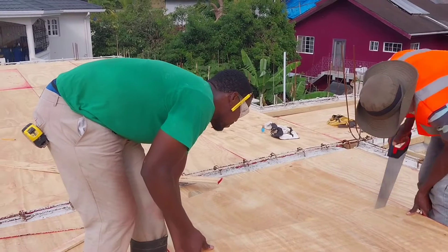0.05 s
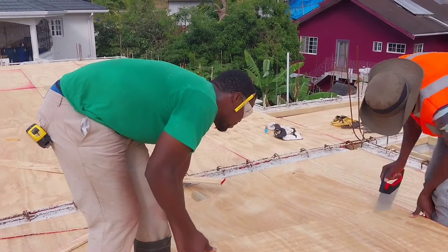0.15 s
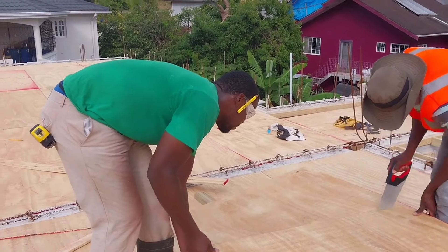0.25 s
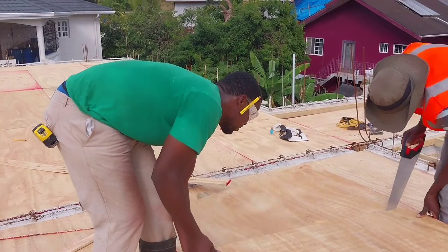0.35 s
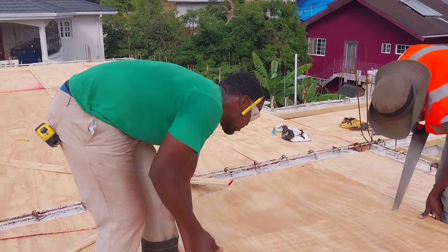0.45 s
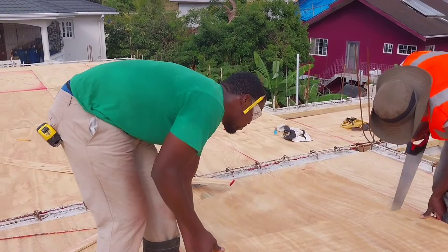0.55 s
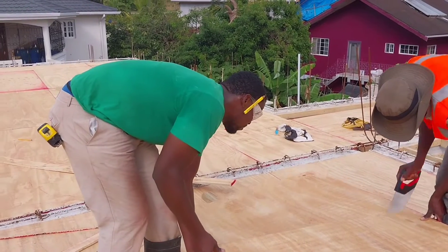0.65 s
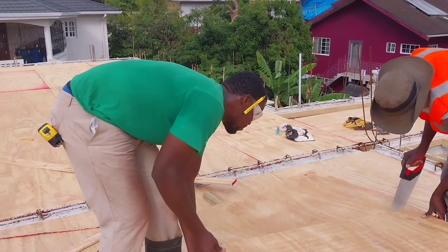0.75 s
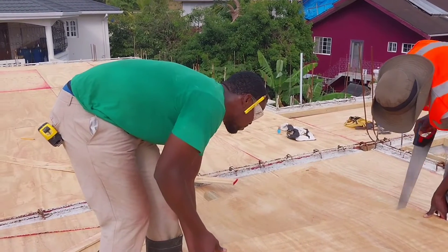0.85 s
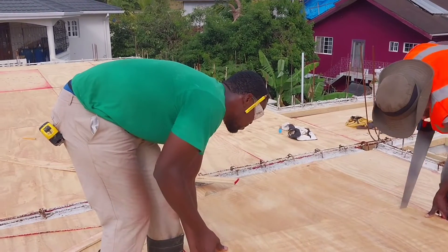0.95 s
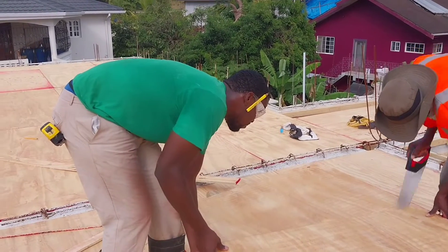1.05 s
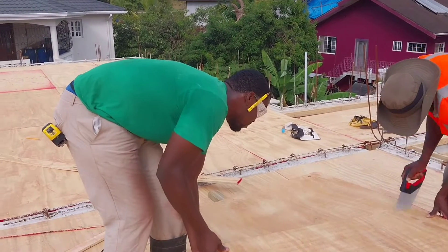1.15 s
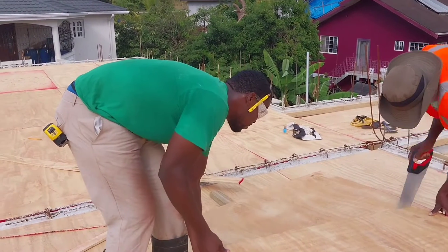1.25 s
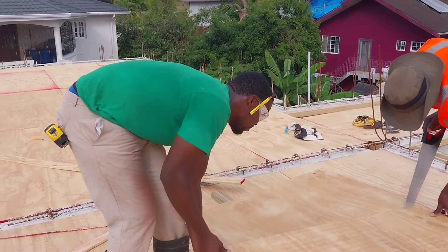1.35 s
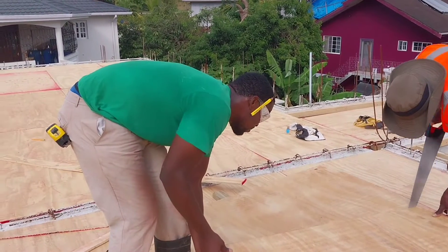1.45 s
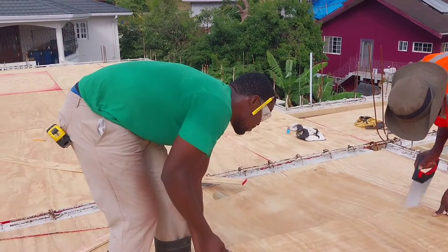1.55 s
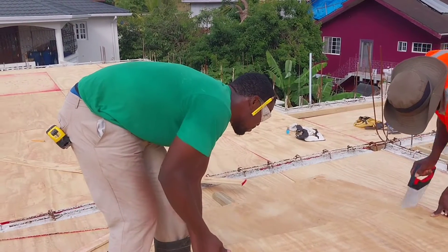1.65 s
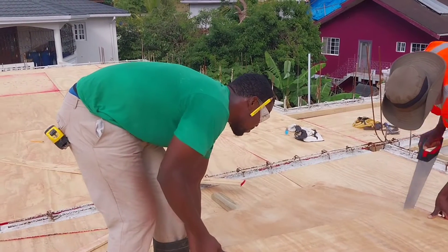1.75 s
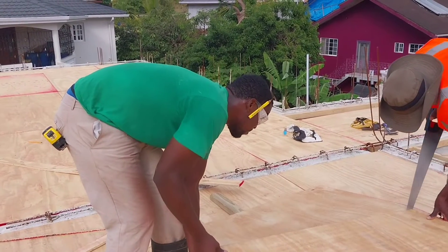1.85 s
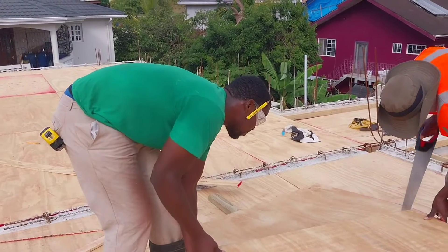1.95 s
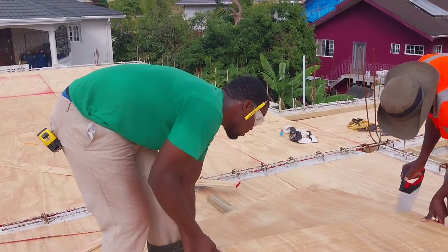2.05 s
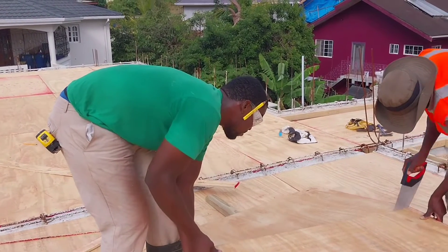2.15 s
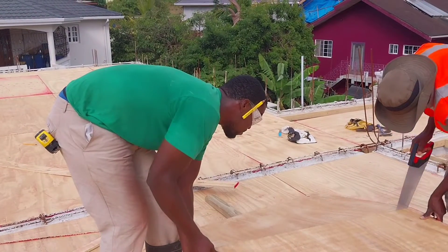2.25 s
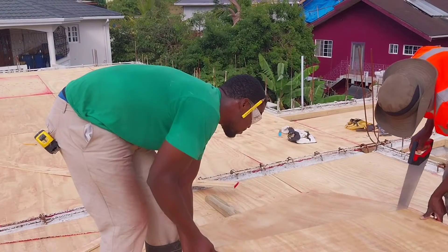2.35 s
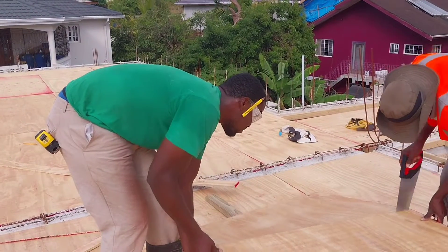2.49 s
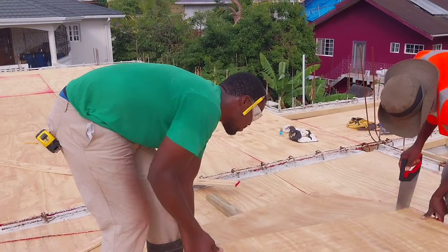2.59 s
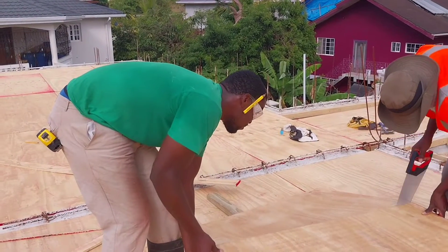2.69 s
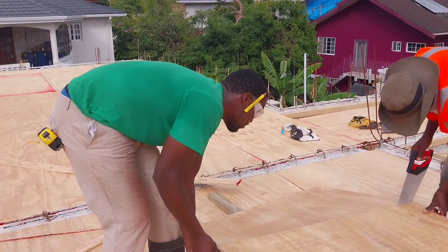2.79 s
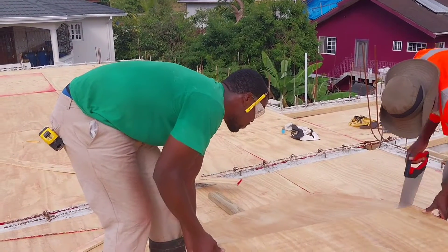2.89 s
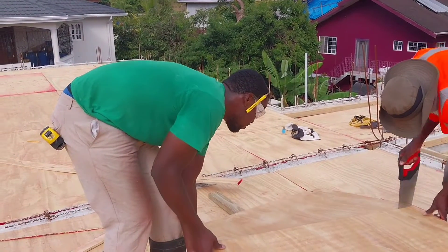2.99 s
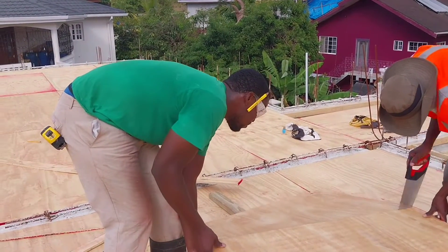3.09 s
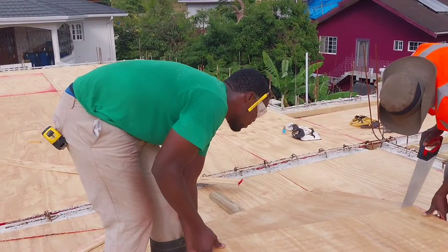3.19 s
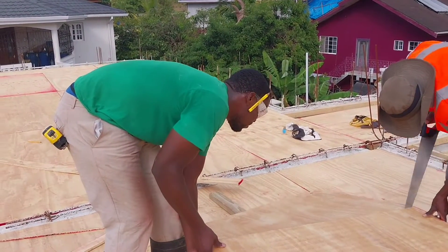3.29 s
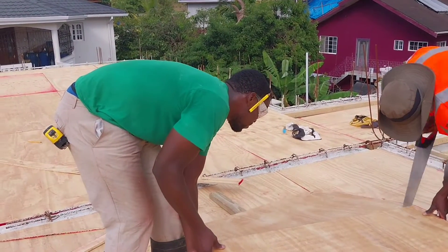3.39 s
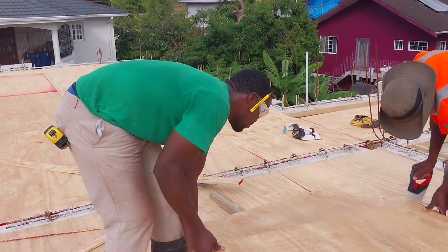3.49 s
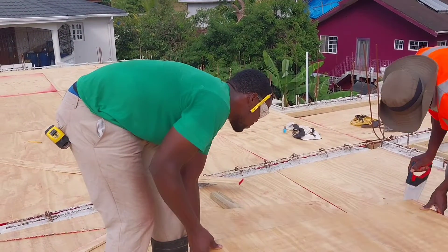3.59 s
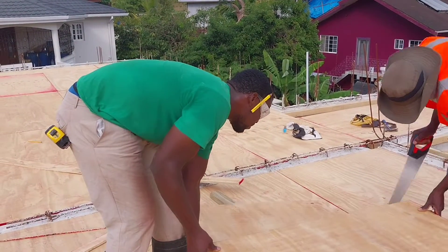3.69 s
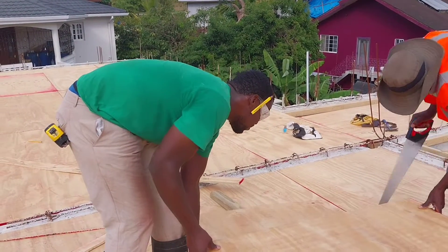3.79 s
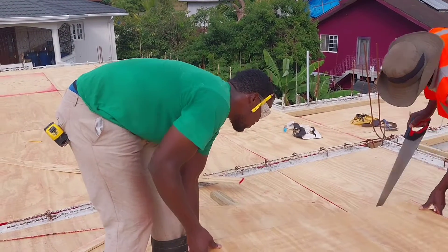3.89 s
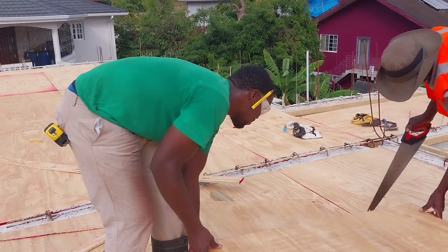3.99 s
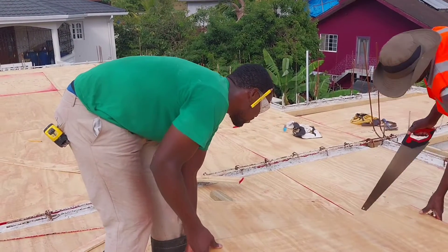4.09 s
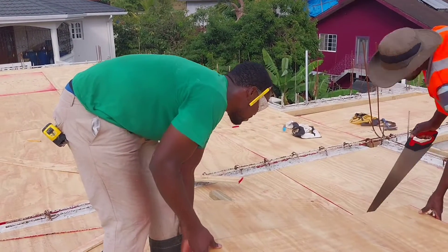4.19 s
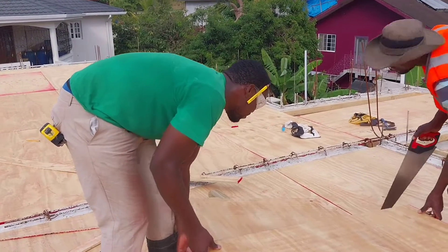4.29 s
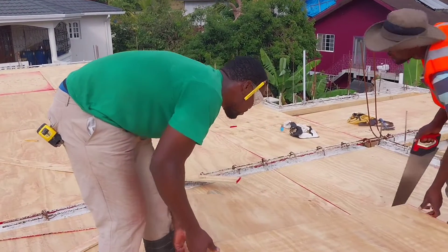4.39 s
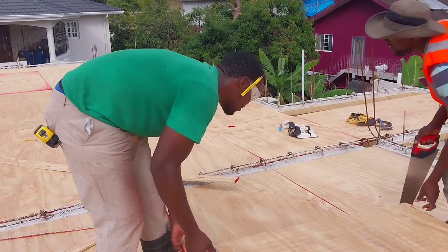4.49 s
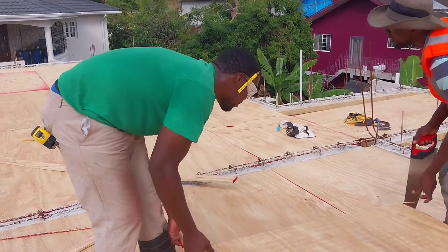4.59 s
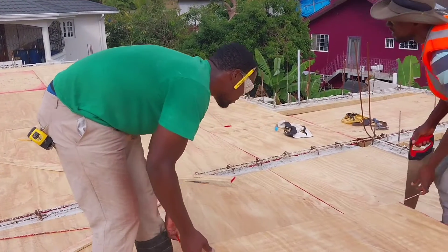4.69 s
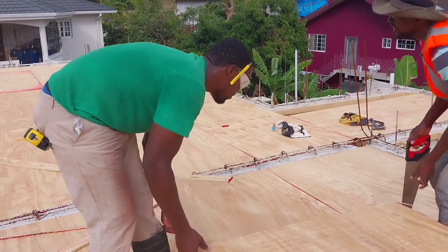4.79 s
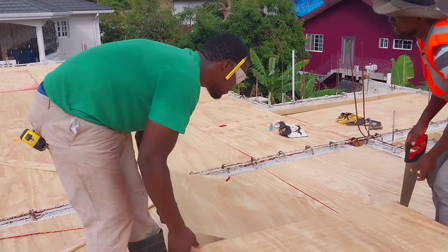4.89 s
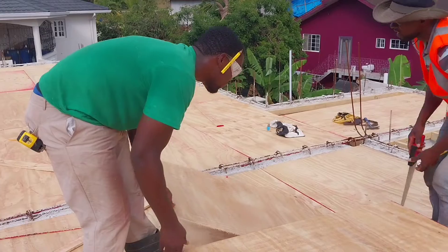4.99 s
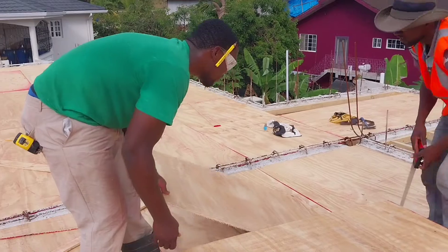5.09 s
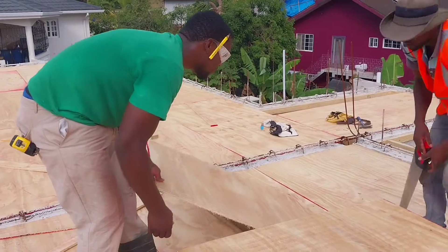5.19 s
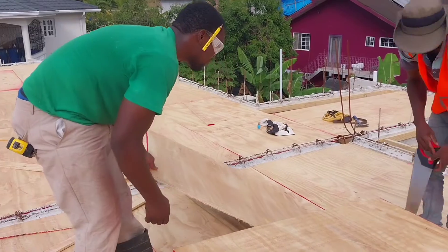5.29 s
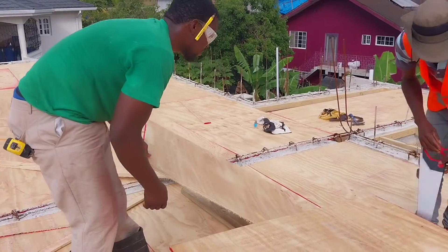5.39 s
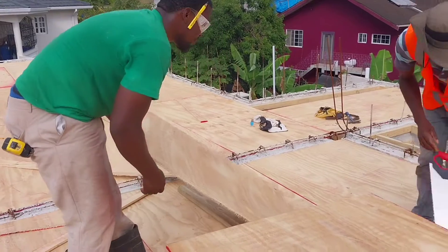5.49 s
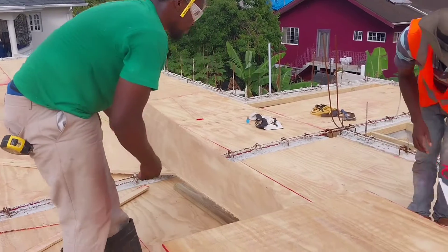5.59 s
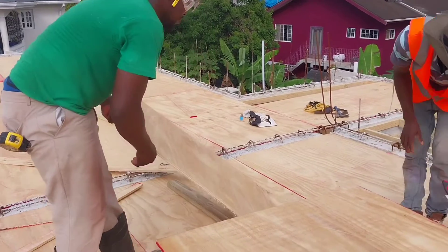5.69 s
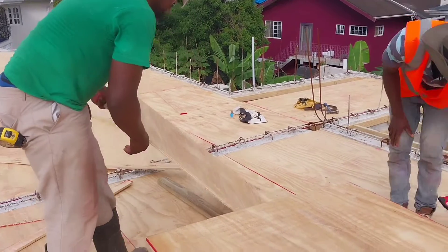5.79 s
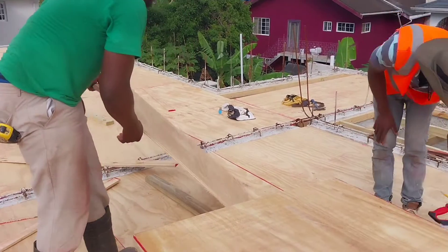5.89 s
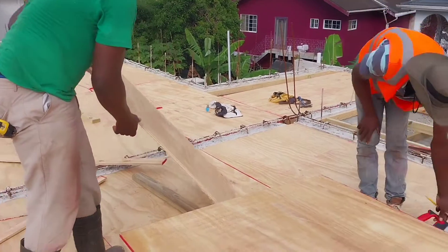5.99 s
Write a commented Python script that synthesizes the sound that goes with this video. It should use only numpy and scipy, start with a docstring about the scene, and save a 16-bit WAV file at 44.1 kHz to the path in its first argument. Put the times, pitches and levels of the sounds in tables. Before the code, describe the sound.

A handsaw works close by on an open plywood deck, over a faint far site wash and low hum. Five quick pushes peak near 0.2, 0.7, 1.2, 1.7 and 2.1 s. Each swells into a buzzing tooth hum with gritty tearing, then brakes abruptly, shaking the sheet in hollow low tones; lighter return drags lie between. Bright splinters crack, strongest around 1.26, 1.75, 1.9 and 2.25 s, with soft thuds. From 2.3 to 3.4 s only bumps and weak scratchy drags remain. One last push rasps at 3.5 s, then a heavy thud at 3.63 s, deep flexing rumble and dull bouncing knocks until 4.15 s. It is quieter until about 5 s, when the offcut scrapes dryly over the deck, loudest near 5.45 and 5.7 s, with short squeaks at 5.3 and 5.6-5.85 s and small knocks, fading to 6 s over a returning low rumble.

```python
"""Handsaw through plywood on an open deck

A handsaw rasps through a plywood sheet: teeth hum on each push, fibres tear and splinters snap.
The offcut drops and bounces in soft thuds, flexes in a deep rumble and later scrapes over the deck.
A far site wash with a low hum lies under it, and short scattered echoes follow the near sounds.
Two microphone ports: the left one is further from the saw and shaded in the treble."""
import sys
import numpy as np
from scipy import signal
from scipy.fft import rfft, irfft
from scipy.io import wavfile

SR = 44100
rng = np.random.default_rng(int(sys.argv[2]) if len(sys.argv) > 2 else 0)


def dump(signal):
    """Clip the signal to [-1, 1] and save it as 16-bit WAV at the path in sys.argv[1]."""
    limited = np.clip(np.atleast_2d(signal).T, -1, 1)
    pcm = np.round(limited * 32767).astype(np.int16)
    wavfile.write(sys.argv[1], SR, pcm)


N = 266805


def amp(db):
    """Decibels to gain."""
    return 10 ** (np.asarray(db) / 20)


def rms_one(x):
    """Scaled to rms 1."""
    return x / np.sqrt(np.mean(x ** 2) + 1e-20)


def in_time(rows, outside=None):
    """Columns of a curve over time, interpolated at every sample."""
    s, *columns = np.transpose(rows)
    t = np.arange(N) / SR
    return [np.interp(t, s, column, outside, outside) for column in columns]


def butterworth(x, kind, hz, order=2):
    """Smooth low, high or band pass with its edges at hz."""
    return signal.sosfilt(signal.butter(order, hz, kind, fs=SR, output="sos"), x)


def resonance(x, hz, width_hz):
    """Two-pole peak with gain 1 on top."""
    r = np.exp(-np.pi * width_hz / SR)
    zeros = [(1 - r * r) / 2, 0, (r * r - 1) / 2]
    poles = [1, -2 * r * np.cos(2 * np.pi * hz / SR), r * r]
    return signal.lfilter(zeros, poles, x + 1e-18)


def colour(x, points):
    """Causal (minimum-phase) filter with the given (Hz, dB) response."""
    hz, db = np.transpose(points)
    bins_hz = np.arange(2049) * SR / 4096
    log_gain = np.interp(np.log(bins_hz + 1), np.log(hz), db) * np.log(10) / 20
    cepstrum = irfft(log_gain)
    # folding the cepstrum forward in time makes the filter causal
    cepstrum[1:2048] *= 2
    cepstrum[2049:] = 0
    return signal.oaconvolve(x, irfft(np.exp(rfft(cepstrum))))[:N]


def drift(rate_hz):
    """Slow random wander of rms 1: noise through a double low pass."""
    r = np.exp(-2 * np.pi * rate_hz / SR)
    wander = signal.lfilter([1], [1, -2 * r, r * r], rng.standard_normal(N + SR))
    return rms_one(wander[SR:])


def grains(per_s, spread_db):
    """Random clicks of uneven size and sign; rms 1."""
    sizes = amp(spread_db * np.minimum(rng.exponential(1, N), 4)) * rng.standard_normal(N)
    return rms_one(sizes * (rng.random(N) < per_s / SR))


# The far site beyond the deck. Each row: frequency in Hz, gain in dB.
SITE_COLOUR = [(18, -40), (30, -19.5), (41, -13), (64, 3), (86, -20.5), (437, -20.5), (526, -29),
               (1010, -25), (1390, -31.5), (2010, -23.5), (3310, -43.5), (3870, -37.5), (6050, -43),
               (12000, -53.5), (16000, -64.5)]
SITE_DB, HUM_HZ, HUM_DB = -48.5, 54.4, -58.5


def site():
    """Far wash, alike at both ports only in the bass, and a wavering low hum."""
    both, left, right = (colour(rng.standard_normal(N), SITE_COLOUR) for _ in range(3))
    bass = butterworth(both, "low", 450)
    rest = butterworth(np.array([left, right]), "high", 450)
    wash = rms_one(bass + rest)
    hum_phase = 2 * np.pi * np.cumsum(HUM_HZ + 2.0 * drift(15)) / SR
    hum = np.sin(hum_phase) * amp(HUM_DB + 1.5 * drift(2))
    return amp(SITE_DB + 0.5 * drift(1.4)) * wash + hum


DECK_T60_S, DECK_DB, DECK_LOW_HZ = .05, -8, 1200


def deck(x):
    """Short scattered echoes off deck, timber and workers, other ones at each port."""
    t = np.arange(SR // 5) / SR
    echoes = rng.standard_normal((2, len(t))) * amp(-60 * t / DECK_T60_S) * (t > .001)
    bright = butterworth(x, "high", DECK_LOW_HZ, order=1)
    return np.array([signal.oaconvolve(bright, e / np.linalg.norm(e))[:N] for e in echoes])


# The loose offcut flexing close by. Each row: time in seconds, level in dB.
SWAY = [(3.55, -69), (3.75, -30.5), (4.4, -61), (5.2, -47.5), (6.05, -40)]


def sway():
    """The loose offcut flexes slowly, a deep rumble of narrow-band noise."""
    deep = butterworth(rng.standard_normal(N), "band", [44, 66])
    return amp(in_time(SWAY, -99)[0]) * rms_one(deep)


# The offcut sliding over the deck. Each row: time in seconds, level in dB.
SLIDE = [(4.8, -68.5), (5.15, -49.5), (5.4, -41), (5.44, -36), (5.55, -42), (5.71, -33.5), (5.8, -38),
         (5.92, -44.5), (5.98, -43.5), (6.05, -47.5)]
# Tone of the scrape. Each row: frequency in Hz, gain in dB.
SLIDE_COLOUR = [(350, -19.5), (600, -5.5), (900, -4), (1200, -3.5), (1500, -1.5), (2000, 6.5), (2800, -8),
                (3500, -17), (4500, -17.5), (7500, -24.5), (10000, -51.5)]
# Its edge sticks and sings briefly. Each row: start in seconds, end in seconds, pitch in Hz, level in dB.
SQUEAKS = [(5.286, 5.412, 3100, -53), (5.57, 5.736, 1404, -39.5), (5.574, 5.686, 2700, -43.5),
           (5.753, 5.857, 2470, -43)]
# Air and dust in the treble, for scrape, snaps and sawing. Each row: frequency in Hz, gain in dB.
TOP_COLOUR = [(4500, -36.5), (6500, -10), (7500, -4), (8800, -21), (9500, -10), (10500, -4.5),
              (12200, -0.5), (15500, -7)]
SLIDE_TOP_DB = -18   # treble of the scrape against the rest


def slide():
    """The offcut's edge scrapes over the deck and now and then sticks at one pitch."""
    rub = grains(9000, spread_db=-2.0) * amp(2.4 * drift(30))
    body = rms_one(colour(rub, SLIDE_COLOUR))
    treble = amp(SLIDE_TOP_DB) * rms_one(colour(rub, TOP_COLOUR))
    out = amp(in_time(SLIDE, -89.5)[0]) * (body + treble)
    t = np.arange(N) / SR
    for start, end, hz, level_db in SQUEAKS:
        swell = np.sin(np.pi * np.clip((t - start) / (end - start), 0, 1))
        pitched = resonance(resonance(rub, hz, 0.076 * hz), hz, 0.065 * hz)
        out += amp(level_db) * swell * rms_one(pitched)
    return out


# Modes of the plywood sheet. Each row: frequency in Hz, width in Hz, gain in dB.
SHEET = [(105.8, 12, 8.5), (154.8, 21, 3.5), (194.5, 21, 2), (234.5, 15.7, 6), (276.6, 25, -0.5),
         (344.7, 22, 1), (413.5, 49, -3.5), (556.5, 43, -7), (618.2, 17, -4), (860, 150, -8.5),
         (1050, 110, -8.5), (1480, 140, 1.5)]


def sheet(force):
    """The plywood's modes in parallel, signs alternating."""
    modes = enumerate(SHEET)
    return sum((-1) ** k * amp(db) * resonance(force, hz, width_hz) for k, (hz, width_hz, db) in modes)


# Steady shaking of the sheet. Each row: time in seconds, level in dB.
SHAKE = [(0, -35), (0.45, -38.5), (1.05, -42.5), (1.45, -36), (1.86, -34), (2.1, -37.5), (2.38, -28),
         (2.45, -43), (2.93, -57.5), (3.35, -39), (3.52, -38), (4.08, -44), (4.3, -47.5), (4.6, -58.5),
         (5.15, -45.5), (5.5, -40.5), (6.05, -40)]
# Shoves and bounces that swell the shaking. Each row: time in seconds, level in dB.
SHOVES = [(0.0, -18.5), (2.0, -25.5), (2.3, -26), (2.62, -27.5), (2.98, -31.5), (3.05, -48), (3.7, -20),
          (3.8, -22), (3.93, -24), (4.0, -30), (4.12, -36), (4.2, -36.5), (5.26, -35), (5.33, -32),
          (5.42, -36.5), (5.55, -54), (5.8, -44)]
ENTRY_SHOVE_S, BRAKE_SHOVE_S = -.063, .088   # from the fastest moment of a push
SHOVE_RISE_DB_PER_S, SHOVE_FALL_DB_PER_S = 264.5, 262.5


def shake():
    """Dense uneven, dull jolts sound the sheet's low modes; each push shoves it on entry and braking."""
    t = np.arange(N) / SR
    shoves = list(SHOVES)
    for s, *_, entry_db, brake_db in SPEEDS:
        shoves += [(s + ENTRY_SHOVE_S, entry_db), (s + BRAKE_SHOVE_S, brake_db)]
    level = amp(in_time(SHAKE)[0])
    for s, db in shoves:
        level += amp(db + np.minimum(SHOVE_RISE_DB_PER_S * (t - s), SHOVE_FALL_DB_PER_S * (s - t)))
    jolts = butterworth(grains(2000, spread_db=2.5), "low", 380)   # soft contacts are dull
    return sheet(level * jolts) / np.std(sheet(jolts))


# Soft blows on the sheet. Each row: start in seconds, force in dB, pitch in Hz.
THUDS = [(1.378, -4, 229), (1.896, -7, 360), (2.174, -8.5, 237), (2.334, -5.5, 232.9), (2.601, -17.5, 222),
         (2.949, -8, 236), (3.365, -21, 108.4), (3.629, 3.5, 221), (3.885, -13.5, 241.6),
         (3.973, -15.5, 223), (4.151, -10, 227), (5.293, -17.5, 207), (5.711, -17.5, 132),
         (5.961, -18.5, 225)]


def thuds():
    """The sheet bows for a cycle and a half at the blow's own pitch, then rings on in its modes."""
    force = np.zeros(N)
    for s, db, hz in THUDS:
        t = np.arange(round(1.5 * SR / hz)) / SR
        at = round(s * SR)
        swell = np.sin(np.pi * hz * t / 1.5) ** .6
        force[at:at + len(t)] += amp(db) * swell * np.sin(2 * np.pi * hz * t)
    return 0.14 * force + amp(-4.5) * sheet(force)


# Splinters snap and wood knocks. Each row: start in seconds, level in dB, top octave in dB against
# that level, low mids in dB against that level, time to die by 60 dB in seconds.
SNAPS = [(0.352, -22, 4.5, -41, 0.029), (0.4402, -30.5, 19, -33, 0.039), (0.832, -30, 5.5, -35, 0.11),
         (0.911, -40.5, 22, -28, 0.095), (0.9728, -38.5, -7, -34, 0.14), (1.264, -14.5, -5, -48, 0.021),
         (1.291, -31, 3, -42, 0.058), (1.374, -40, 6, -3, 0.11), (1.7481, -14.5, -1.5, -48, 0.032),
         (1.7948, -31.5, 4, -34, 0.033), (1.8177, -33, -9, -36, 0.028), (1.8528, -29.5, 1, -38, 0.036),
         (1.8936, -10, -1.5, -18, 0.035), (1.941, -28.5, 1, -6, 0.047), (2.2352, -11.5, 2, -26, 0.0097),
         (2.2557, -13.5, -4, -14.5, 0.048), (2.337, -48, -9, 8.5, 0.065), (2.951, -45.5, -24, 7, 0.034),
         (3.6719, -31.5, -17, -8, 0.03), (3.69, -46.5, -25, 11.5, 0.027), (3.781, -52.5, -35, 13.5, 0.029),
         (3.81, -55, -30, 9, 0.035), (3.741, -42.5, -35, 16.5, 0.02), (3.8819, -47, -35, 21.5, 0.037),
         (3.9348, -58.5, -37, 13, 0.04), (3.9644, -55, -38, 20, 0.082), (4.153, -57.5, -27, 3.5, 0.059),
         (5.197, -38, -30, -0.5, 0.043), (5.418, -38.5, -25, -4, 0.068), (5.4624, -39, -10, -16, 0.03)]
# Low-mid tone of the knocks. Each row: frequency in Hz, gain in dB.
KNOCK_COLOUR = [(250, -12), (450, -2), (900, 0), (1500, -4), (2200, -4), (3500, -12), (6000, -30),
                (12000, -55)]
# Tone of torn fibres, for snaps, tooth ticks and rasp. Each row: frequency in Hz, gain in dB.
RASP_COLOUR = [(450, -20), (700, -21.5), (900, 0), (1200, -19.5), (1700, 0), (2100, 0), (3100, 0.5),
               (4400, -5.5), (4800, -14.5), (5500, -3.5), (6500, -20.5), (9000, -29.5)]
BLADE_HZ, BLADE_WIDTH_HZ = 3850, 700   # the saw blade's ring


def snaps():
    """Each snap is a click and a dying noise tail, in three ranges; the low one also rings the sheet."""
    force, t = np.zeros((3, N)), np.arange(SR // 5) / SR
    for s, db, top_db, low_db, t60 in SNAPS:
        at = round(s * SR)
        fade = amp(-60 * t / max(t60, .005)) * np.minimum(t / 0.0005, 1)
        burst = 0.92 * rng.standard_normal((3, len(t))) * fade
        burst[:, 0] += 8.0   # the click
        force[:, at:at + len(t)] += amp(db + np.array([[0], [top_db], [low_db]])) * burst
    white = rng.standard_normal(N)

    def evened(x, points):
        # coloured, with the filter's gain on white noise taken out
        return colour(x, points) / np.std(colour(white, points))

    crack = evened(force[0], RASP_COLOUR) + 1.5 * resonance(force[0], BLADE_HZ, 1700)
    woody = butterworth(sheet(force[2]), "band", [300, 1000])   # upper modes ring after a knock
    return crack + amp(34.5) * woody + evened(force[1], TOP_COLOUR) + evened(force[2], KNOCK_COLOUR)


# Speed of each push. Each row: fastest moment in seconds, teeth per second then, speed-up in teeth
# per second per second, hum level in dB, shake on entry in dB, shake on braking in dB.
SPEEDS = [(0.209, 435, 3000, -16, -25, -26.5), (0.732, 412, 1290, -16.5, -27.5, -29),
          (1.19, 475, 2300, -14, -24, -23.5), (1.68, 430, 1200, -15.5, -23.5, -31.5),
          (2.143, 375, 400, -12, -30, -33), (3.575, 396, 2320, -22, -35.5, -28)]
SPEED_UP_S, BRAKE_S, BRAKED_SHARE = .085, .1, .25   # the share of top speed left after braking


def tooth_rate():
    """The blade speeds up evenly, then brakes along a half cosine."""
    t, per_s = np.arange(N) / SR, np.zeros(N)
    for s, top, speed_up, *_ in SPEEDS:
        rising = top + speed_up * np.maximum(t - s, -SPEED_UP_S)
        braking = (1 + np.cos(np.pi * np.clip((t - s) / BRAKE_S, 0, 1))) / 2
        falling = top * (BRAKED_SHARE + (1 - BRAKED_SHARE) * braking)
        rate = np.where(t < s, rising, falling)
        per_s = np.where((t > s - 2 * SPEED_UP_S) | (per_s == 0), rate, per_s)
    return per_s


# Overtones of the tooth hum. Each row: multiple of the tooth rate, level in dB.
TOOTH_ORDERS = [(1, -1), (2, -5), (3, -15), (4, -17)]
# Swell of the hum in a push. Each row: seconds from the fastest moment, dB against the push's hum level.
HUM_SWELL = [(-.085, -21.5), (-.04, -9), (0, -3.5), (.045, 1), (.07, -10.5), (.1, -34.5)]
HUM_IN_SHEET_DB = 0.5   # the hum swells where it crosses a mode
TOOTH_TICK_DB = -17     # the ticks against the hum's level


def teeth():
    """Uneven teeth hum at the tooth rate, each one ticks, and ragged bites jolt the sheet's modes."""
    per_s = tooth_rate() * (1 + .03 * drift(50))   # uneven tooth spacing
    phase = 2 * np.pi * np.cumsum(per_s) / SR
    level = np.zeros(N)
    for s, _, _, hum_db, *_ in SPEEDS:
        level += amp(in_time(np.add(HUM_SWELL, (s, hum_db)), -200)[0])

    sharp = (per_s / per_s.max()) ** 2   # overtones fade as the blade slows
    hum = np.zeros(N)
    for order, db in TOOTH_ORDERS:
        hum += amp(db + 3.5 * drift(35)) * sharp ** (order - 1) * np.sin(order * phase)
    hum *= level
    hum = 0.9 * hum + amp(HUM_IN_SHEET_DB) * sheet(hum)

    ticks = np.diff(phase // (2 * np.pi), prepend=0) * amp(2.0 * rng.standard_normal(N))
    blade = rms_one(resonance(ticks, BLADE_HZ, BLADE_WIDTH_HZ))
    ticking = rms_one(rms_one(colour(ticks, RASP_COLOUR)) + 0.38 * blade)

    bites = butterworth((1 + np.cos(phase)) * grains(3000, spread_db=2.0), "band", [300, 1000])
    jolted = sheet(level * bites) / np.std(sheet(bites))
    return phase, hum + amp(TOOTH_TICK_DB) * level * ticking + amp(-10.0) * jolted


# Cutting strokes. Each row: bite in seconds, full force in seconds, let-off in seconds, end in seconds,
# entry level in dB, rasp level in dB, top octave in dB against it, blade ring in dB against it.
PUSHES = [(0.109, 0.196, 0.24, 0.35, -34.5, -21, -8, -10), (0.6, 0.721, 0.75, 0.86, -35, -20, -8, -6),
          (1.063, 1.178, 1.23, 1.217, -38.5, -22, -6.5, 4.5),
          (1.562, 1.658, 1.71, 1.768, -38.5, -25.5, -7, 4.5),
          (2.01, 2.123, 2.139, 2.276, -36.5, -22, -4.5, -7),
          (3.455, 3.544, 3.59, 3.635, -36, -18, -11.5, -14.5)]
# Light strokes, teeth dragging. Each row: start in seconds, loudest in seconds, end in seconds, rasp
# level in dB, fade until the lift in dB, top octave in dB and blade ring in dB, both against the rasp.
DRAGS = [(-0.05, 0.0, 0.13, -38.5, 12.5, -9, -13), (0.346, 0.36, 0.61, -40, 3.5, 2, -2.5),
         (0.79, 0.85, 1.12, -51.5, 0.5, -4, -2), (0.955, 0.985, 1.043, -39.5, 5.5, -3, 6),
         (1.27, 1.285, 1.17, -52, 3, 4, -6), (1.318, 1.34, 1.567, -42, 5.5, -2.5, 3.5),
         (1.723, 1.74, 1.82, -54, 16, 3, -9.5), (1.771, 1.92, 2.036, -34.5, 30.5, -3, 2),
         (2.213, 2.29, 2.425, -48, 4, -7.5, -10.5), (2.39, 2.48, 2.52, -72.5, -13.5, -25, -11),
         (2.533, 2.565, 2.682, -41.5, 0.5, -9.5, -15), (2.69, 2.72, 2.9, -62, 34.5, 2.5, -6.5),
         (2.804, 2.903, 3.2, -71.5, -1, -6, -5), (3.216, 3.315, 3.434, -43, 6.5, -5.5, -9),
         (3.604, 3.66, 4.1, -41, 50, -10.5, -13.5)]
BITE_S, HOLD_SAG_DB, SILENT_DB = 0.031, 2, -62
LIFT_S, QUIET_UNDER_DB = .03, 17


def strokes():
    """Gains of rasp, top octave and blade ring, summed over all strokes."""
    gains = np.zeros((3, N))

    def add(shape, top_db, ring_db):
        gains[:] += amp(in_time(shape, -200)[0] + np.array([[0], [top_db], [ring_db]]))

    for s, full, off, end, entry_db, db, top_db, ring_db in PUSHES:
        add([(s, SILENT_DB), (s + BITE_S, entry_db), (full, db), (off, db - HOLD_SAG_DB),
             (end, SILENT_DB)], top_db, ring_db)
    for s, loud, end, db, fade_db, top_db, ring_db in DRAGS:
        lift_db = db - fade_db
        add([(s, db - QUIET_UNDER_DB), (loud, db), (end - LIFT_S, lift_db),
             (end, lift_db - QUIET_UNDER_DB)], top_db, ring_db)
    return gains


TEAR_IN_SHEET_DB = -4   # tearing carried into the sheet's upper modes, against the rasp


def rasp(phase):
    """Tearing fibres: dense grains bunch at each tooth and catch unevenly; the blade rings fitfully."""
    level, brightness, ringing = strokes()
    catching = amp(1.5 * drift(25) + 1.0 * drift(60) + 0.33 * drift(190))
    bite = (1 + .5 * np.cos(phase)) * catching
    ringing = ringing * amp(2.5 * drift(9))
    in_sheet = butterworth(sheet(grains(3700, spread_db=2.0) * bite), "band", [450, 1100])
    woody = amp(TEAR_IN_SHEET_DB) * level * rms_one(in_sheet)

    def along_the_cut():
        tear = grains(20000, spread_db=5.46) * bite
        blade = rms_one(resonance(tear, BLADE_HZ, BLADE_WIDTH_HZ))
        dust = grains(25000, spread_db=-0.5) * bite
        tearing = level * rms_one(colour(tear, RASP_COLOUR)) + ringing * blade
        return tearing, brightness * rms_one(colour(dust, TOP_COLOUR))

    # both ports share part of the tearing and dust, and each hears more from its own spot of the cut
    (shared_tear, shared_dust), *own = (along_the_cut() for _ in range(3))
    shared = woody + 0.87 * shared_tear + 1.7 * shared_dust
    return shared, np.array([0.67 * tear + 1.23 * dust for tear, dust in own])


LEFT_LAG_SAMPLES = 9


def scene():
    """The near sound shared by the ports reaches the right one first; echoes and site lie around it."""
    phase, hum = teeth()
    shared, own = rasp(phase)
    near = hum + shared + snaps() + thuds() + shake() + sway() + slide()
    direct = np.array([np.roll(near, LEFT_LAG_SAMPLES), near])
    return direct + own + amp(DECK_DB) * deck(near) + site()


# Shading of the left microphone port. Each row: frequency in Hz, gain in dB against the right port.
LEFT_PORT = [(60, -1), (500, 0), (1200, 2), (2800, 4), (4200, 3), (5800, 0), (6800, -10), (7600, -30),
             (9500, -26), (12000, -19), (16000, -16)]
CUTOFF_HZ = 15900


def record(dry):
    """The left port's shading, peaks clipped at full scale, then a steep cut of the top."""
    ports = np.array([colour(dry[0], LEFT_PORT), dry[1]])
    steep = signal.cheby2(14, 50, CUTOFF_HZ, fs=SR, output="sos")
    return signal.sosfilt(steep, np.clip(ports, -1, 1))


dry = scene()
out = record(dry)
dump(out)
```